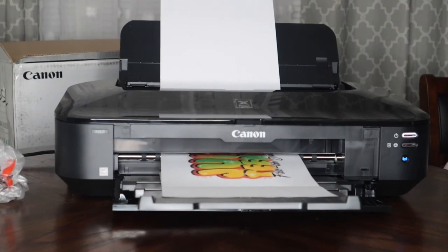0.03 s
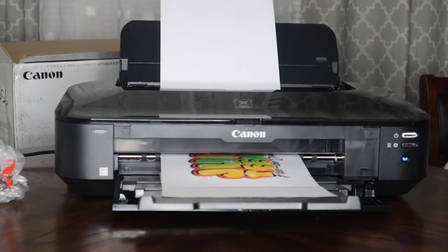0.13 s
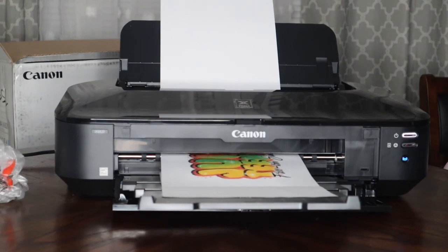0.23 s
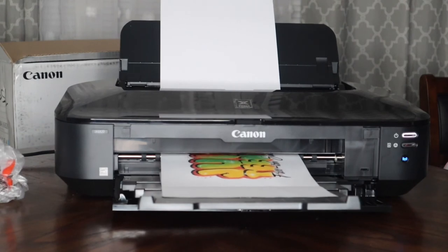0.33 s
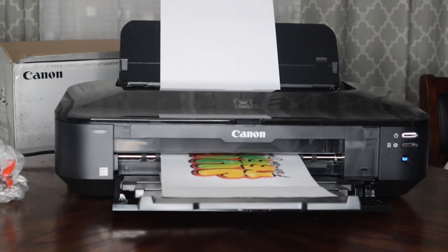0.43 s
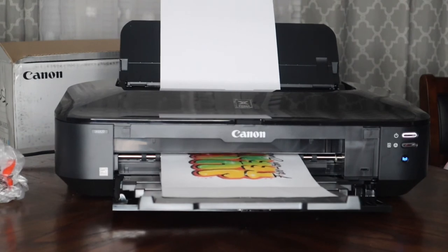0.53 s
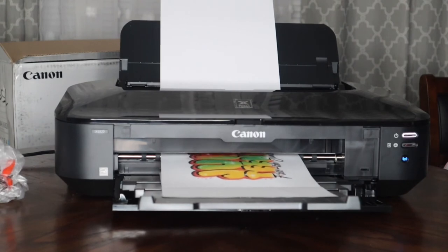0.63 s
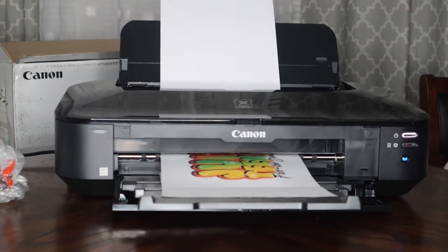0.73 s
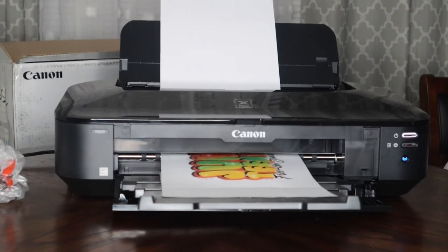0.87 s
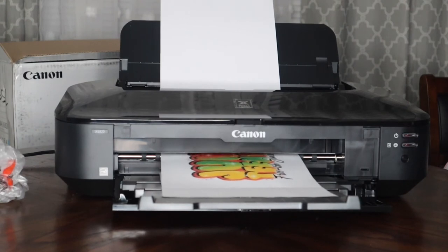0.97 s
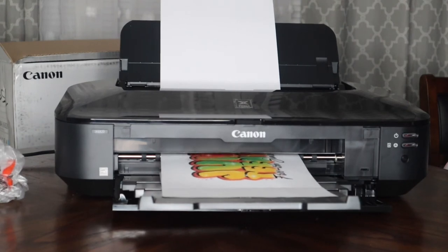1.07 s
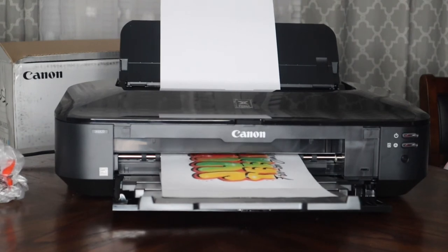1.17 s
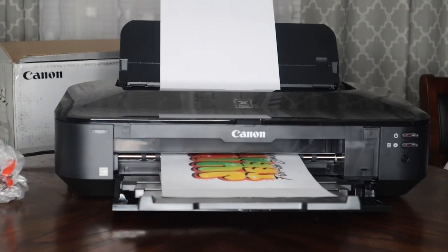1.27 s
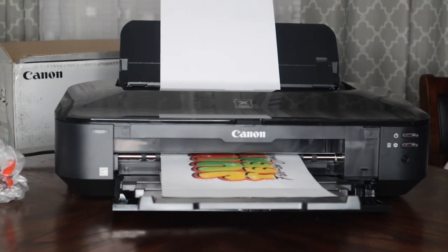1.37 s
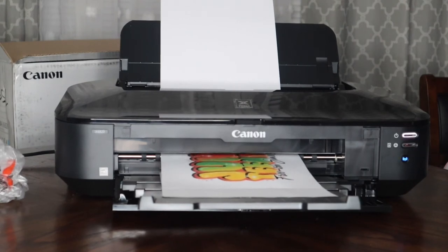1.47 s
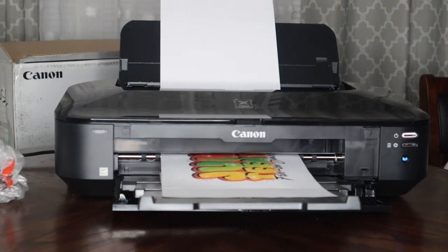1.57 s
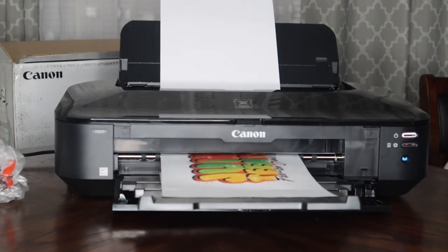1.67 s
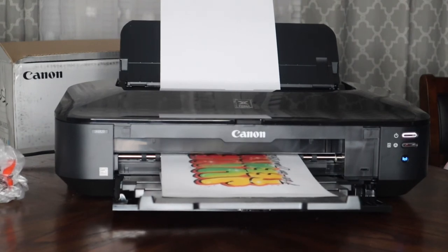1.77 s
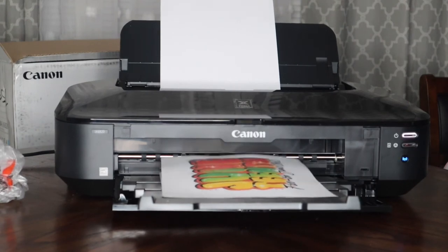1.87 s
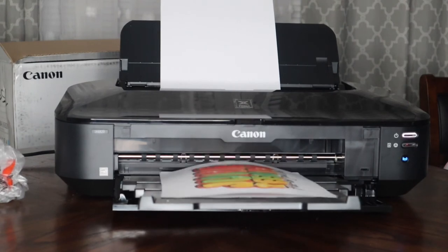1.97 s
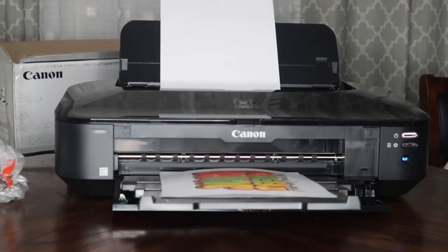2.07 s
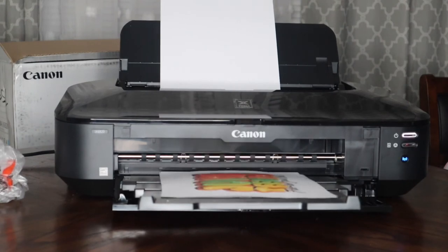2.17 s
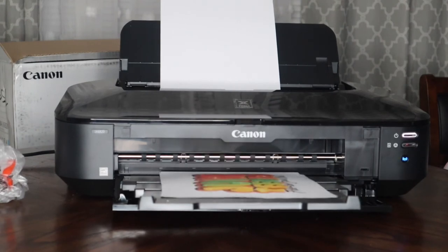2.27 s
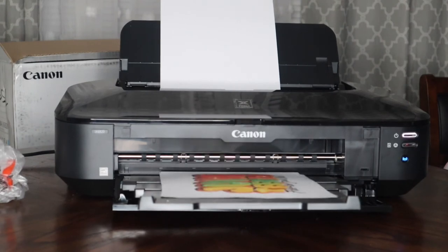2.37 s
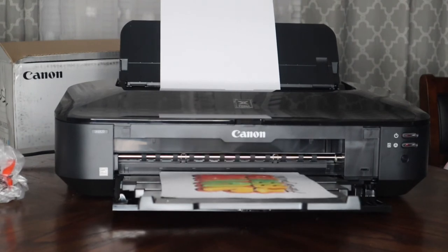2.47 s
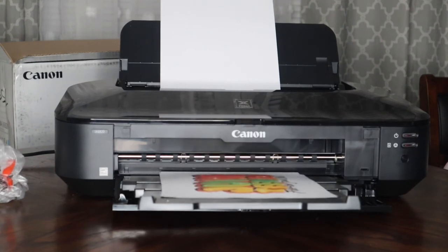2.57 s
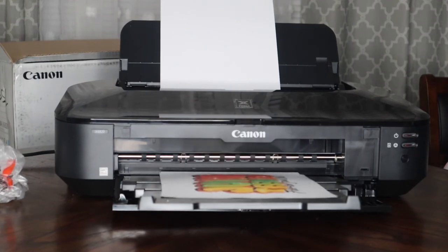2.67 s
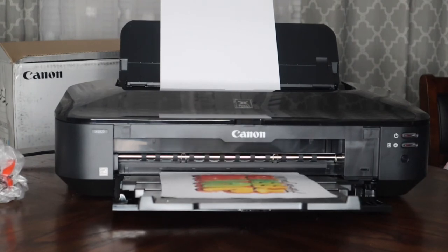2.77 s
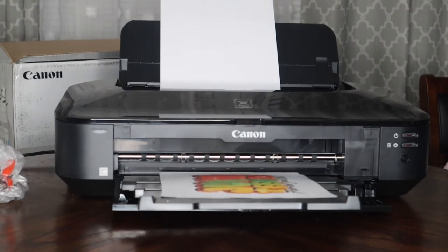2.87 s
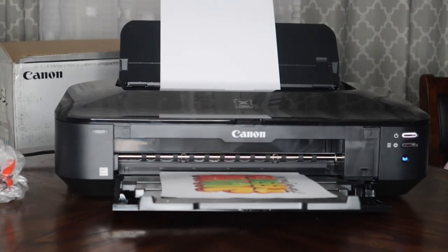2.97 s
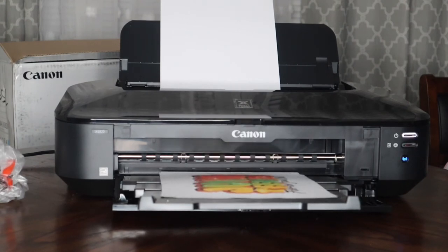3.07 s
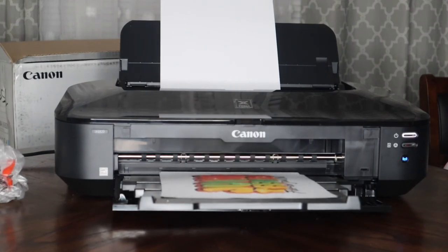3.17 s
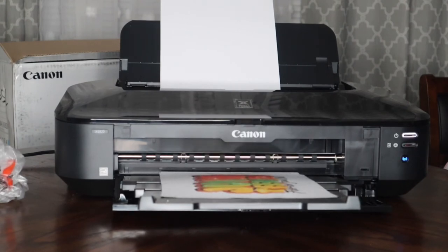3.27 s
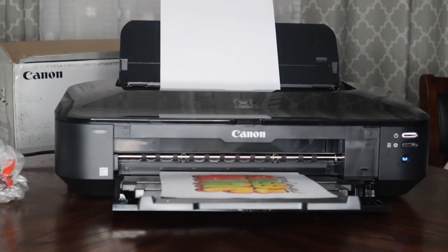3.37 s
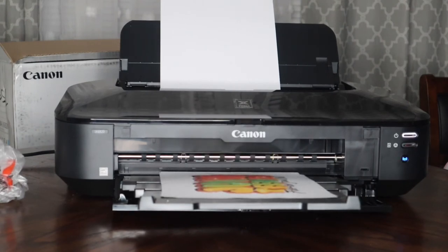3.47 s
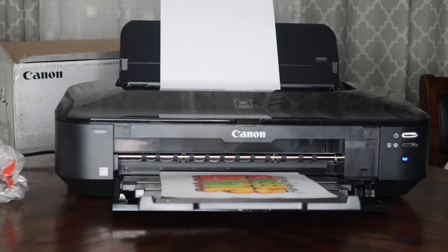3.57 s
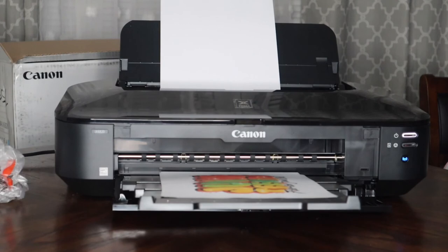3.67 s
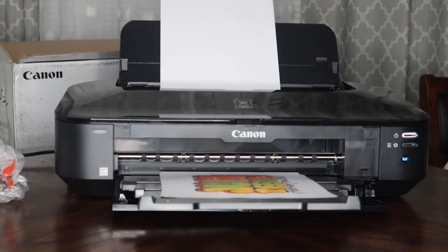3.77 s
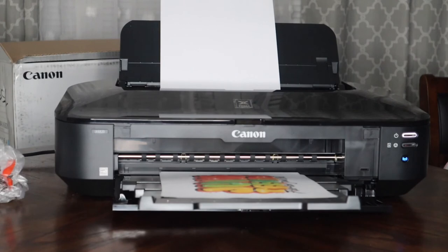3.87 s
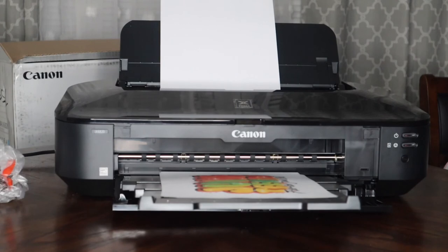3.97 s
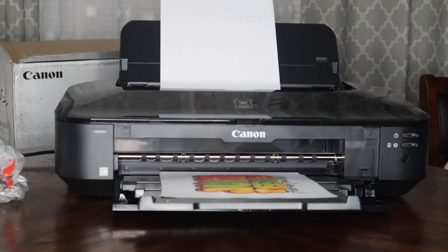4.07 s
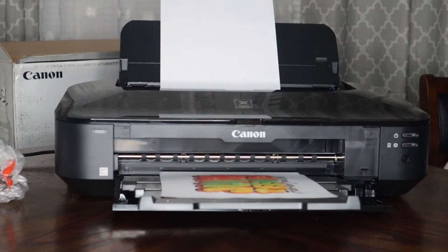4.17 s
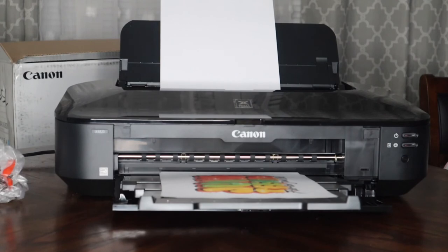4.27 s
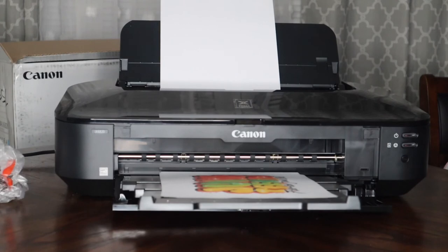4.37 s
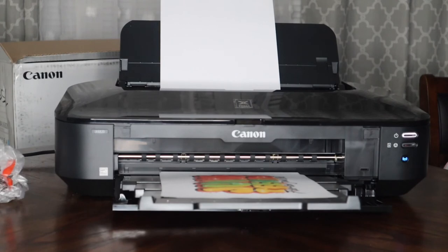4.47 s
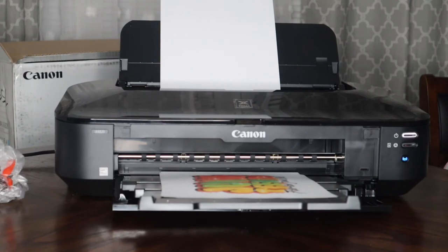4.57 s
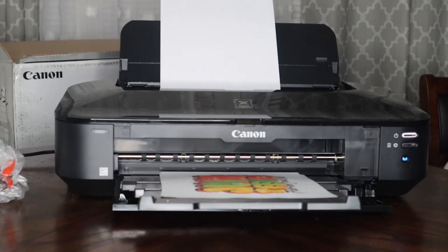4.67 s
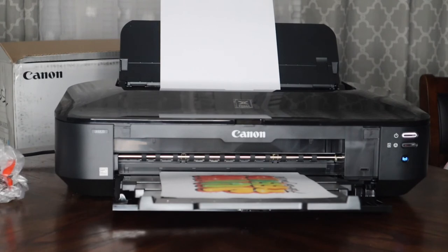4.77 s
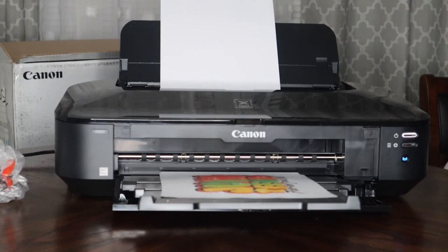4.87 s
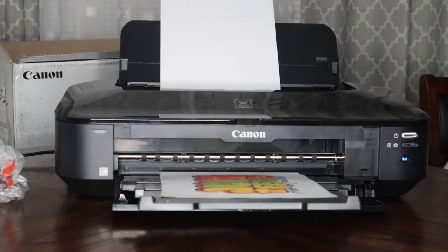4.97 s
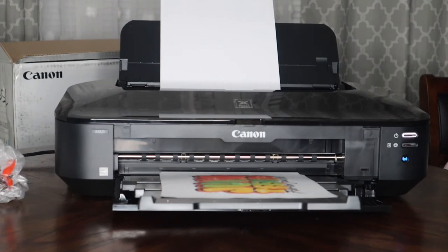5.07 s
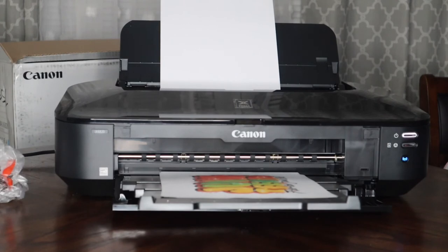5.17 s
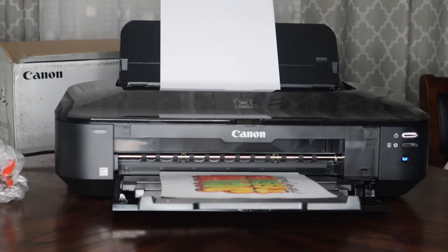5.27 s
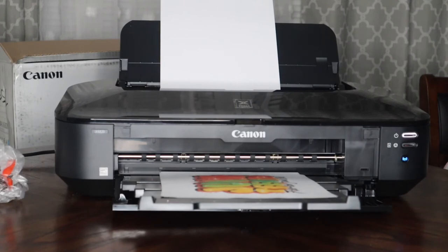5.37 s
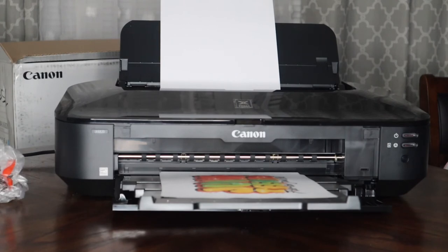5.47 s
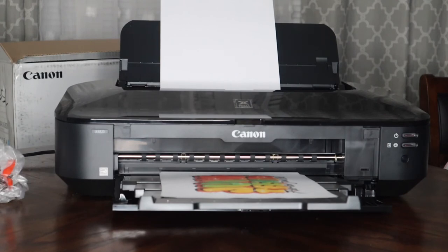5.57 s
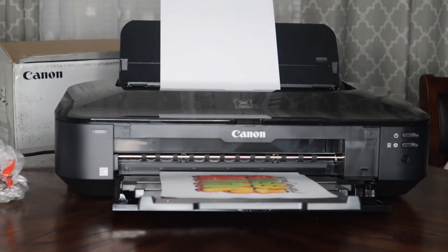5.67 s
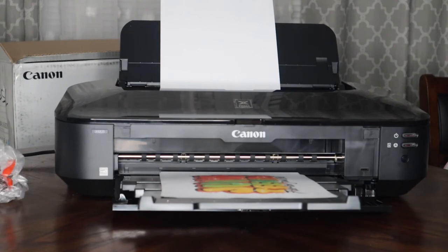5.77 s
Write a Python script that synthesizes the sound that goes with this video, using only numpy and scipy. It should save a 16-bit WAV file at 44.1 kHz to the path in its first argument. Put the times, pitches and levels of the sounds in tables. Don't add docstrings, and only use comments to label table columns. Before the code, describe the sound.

An inkjet printer's head sweeps with short whirs, gears whine the sheet out, a loud plastic clack lands, smaller clacks follow, then quiet room.

```python
import sys
import numpy as np
from scipy import signal
from scipy.fft import rfft, irfft, next_fast_len
from scipy.io import wavfile
from scipy.ndimage import uniform_filter1d

SR = 44100
rng = np.random.default_rng(int(sys.argv[2]) if len(sys.argv) > 2 else 0)


def magnitude_from_level(level_db):
    exponent = np.asarray(level_db, float) / 20
    return 10 ** exponent


def generate_wav(sig):
    pcm = np.round(np.clip(np.atleast_2d(sig).T, -1, 1) * 32767).astype(np.int16)
    wavfile.write(sys.argv[1], SR, pcm)


N = 256220


def rms_one(x):
    return x / np.sqrt(np.mean(x ** 2) + 1e-20)


def at_hz(points, hz):
    curve = np.array(points)
    return np.interp(np.log(hz), np.log(curve[:, 0]), curve[:, 1])


def colour(x, spectrum):
    size = next_fast_len(x.shape[-1])
    hz = np.maximum(np.arange(size // 2 + 1) * SR / size, 1)
    shaped = irfft(rfft(x, size) * magnitude_from_level(at_hz(spectrum, hz)), size)
    return rms_one(shaped[..., :x.shape[-1]])


def drift(rate_hz):
    r = np.exp(-80 * np.pi * rate_hz / SR)
    slow = signal.lfilter([1], [1, -2 * r, r * r], rng.standard_normal(N // 40 + 2002))[2000:]
    return np.interp(np.arange(N) / 40, np.arange(len(slow)), rms_one(slow))


def resonate(x, hz, width_hz):
    r = np.exp(-np.pi * width_hz / SR)
    poles = [1, -2 * r * np.cos(2 * np.pi * hz / SR), r * r]
    return signal.lfilter(np.array([1, 0, -1]) * (1 - r * r) / 2, poles, x + 1e-18)


def grit(spread_db, flutter_db):
    level_db = spread_db * drift(600.0) + flutter_db * drift(37.5)
    return rng.standard_normal(N) * magnitude_from_level(level_db)


def spread(count, width):
    size = next_fast_len(count)
    mid, side = rfft(rng.standard_normal((2, size)))
    hz = np.maximum(np.arange(len(mid)) * SR / size, 1)
    side = side * magnitude_from_level(at_hz(width, hz))
    return irfft(mid + side * [[1], [-1]], size)[:, :count]


def whine(lines, waver, flicker_db, speed=1):
    time = np.cumsum(speed + waver * drift(5.27)) / SR
    out = np.zeros(N)
    for hz, db in lines:
        level = magnitude_from_level(db + flicker_db * drift(3.9))
        out += level * np.sqrt(2) * np.sin(2 * np.pi * (hz * time + rng.random()))
    return out


def bursts(times, peaks_db, rises, lengths):
    out = np.zeros(N)
    for s, db, rise, length in zip(times, peaks_db, rises, lengths):
        start, length = round(s * SR), max(length, .001)
        age = np.arange(min(round(SR * min(1, 12 * length)), N - start)) / SR
        swell = 1 - np.exp(-age / max(rise, 2e-4))
        out[start:][:len(age)] += magnitude_from_level(db) * swell * np.exp(-age / length)
    return out


def moves(rows, rise, fall, sag_db=0, column=2):
    out = np.zeros(N)
    for row in rows:
        start, length = row[0], row[1]
        part = out[round(start * SR):round((start + length + 12 * fall) * SR)]
        age = np.arange(len(part)) / SR
        level = magnitude_from_level(row[column] - sag_db * np.minimum(age, length))
        part += level * np.minimum(age / rise, 1) * np.exp(-np.maximum(age - length, 0) / fall)
    return out


# hz, level_db
AIR = [(12, -52), (20, -13), (54, -0.5), (107, -5.5), (138, -1.5), (167, -7), (267, -8.5), (306, -7),
       (463, -9), (517, -12.5), (1600, -18), (14500, -44)]
# hz, side_minus_mid_db
AIR_WIDTH = [(60, -19), (150, -4.5), (380, 2), (950, 6.5), (2380, 6), (5980, 8.5), (15000, 7)]
# hz, width_hz, level_db
STANDING = [(57.4, 3.2, 1), (148, 10.3, 1), (228, 17, 0), (278.2, 5.6, 2)]
# hz, side_minus_mid_db
ROOM_WIDTH = [(60, -21), (130, -27), (290, -30), (640, -6), (1410, -3), (3100, 4), (6820, 4), (15000, 6.5)]
# start_s, dull_db, bright_db, decay_s
RUSTLES = [
    (4.55, -67, -68, .8),
    (4.757, -44, -60, .03),
    (4.995, -52, -65, 0.073),
    (5.21, -54, -57.5, 0.081),
    (5.3, -65, -72, .5),
    (5.464, -70, -58, .03),
    (5.4905, -37, -32, .006),
    (5.497, -51, -40, .075),
]
# hz, db_per_hz
DULL = [(240, -26), (400, -27), (422, -35), (513, -6.5), (800, -10), (2000, -25), (2600, -44), (4400, -120)]
# hz, db_per_hz
BRIGHT = [(820, -30), (1400, -3), (2570, 0), (3600, -11), (6540, -17), (7270, -12.5), (11900, -11.5),
          (12700, -13), (14000, -82)]
AIR_DB, RUSTLE_RISE_S = -48, .0022


def house():
    s, dull_db, bright_db, decay = np.transpose(RUSTLES)
    rise = np.full(len(s), RUSTLE_RISE_S)
    air = colour(spread(N, AIR_WIDTH), AIR)
    air = air + sum(magnitude_from_level(db) * resonate(air, hz, width) for hz, width, db in STANDING)
    dull = bursts(s, dull_db, rise, decay) * colour(spread(N, ROOM_WIDTH), DULL)
    bright = bursts(s, bright_db, rise, decay) * colour(spread(N, ROOM_WIDTH), BRIGHT)
    return magnitude_from_level(AIR_DB - 2.0 + 0.32 * drift(5.5)) * air + magnitude_from_level(-1.5) * (dull + bright)


# start_s, length_s, level_db
PASSES = [
    (0.102, .365, -49),
    (.6, .2, -50),
    (0.928, .22, -49),
    (1.251, .22, -50),
]
# start_s, length_s, level_db
STEPS = [
    (0.459, 0.13, -46.5),
    (0.798, .082, -46),
    (1.141, 0.084, -46.5),
    (1.467, 0.031, -50),
    (1.543, .07, -52),
]
# hz, db_per_hz
RUMBLE = [(210, -79), (360, -2.5), (432, 1), (834, -6.5), (1210, -10.5), (1300, -14.5), (1520, -14.5),
          (2200, -19.5), (2860, -41), (4840, -120)]
# hz, db_per_hz
SLIDE = [(760, -20), (1300, -4), (1520, -10.5), (2140, -4), (3710, -4), (4200, -2.5), (5850, -10.5),
         (11100, -12), (14000, -21), (15500, -41)]
PASS_RISE_S, PASS_FALL_S, PASS_RUMBLE_DB = .06, .035, 2
STEP_RISE_S, STEP_FALL_S, STEP_RUMBLE_DB, STEP_HISS_RISE_S = .03, .025, 6, .07


def carriage():
    passes = moves(PASSES, PASS_RISE_S, PASS_FALL_S)
    steps = moves(STEPS, STEP_RISE_S, STEP_FALL_S)
    rumble = magnitude_from_level(PASS_RUMBLE_DB) * passes + magnitude_from_level(STEP_RUMBLE_DB) * steps
    hiss = passes + magnitude_from_level(1.5) * moves(STEPS, STEP_HISS_RISE_S, STEP_FALL_S / 2)
    return magnitude_from_level(-3.5) * (rumble * colour(grit(0.4, 2.5), RUMBLE) + hiss * colour(grit(1.9, 1.5), SLIDE))


# start_s, peak_db, pitch_hz, brightness_db
TICKS = [(.11, -46, 4000, -4.5), (0.463, -29, 4600, -22), (0.48, -31, 2130, -20), (0.549, -31.5, 2080, -12),
         (0.586, -30, 4650, -23), (0.803, -34, 2320, -9), (.823, -38, 2300, -17), (0.86, -41.5, 3020, -6),
         (1.146, -38, 2150, -2.5), (1.16, -40, 2210, -16), (1.262, -37, 4320, -19),
         (1.473, -35.5, 2270, -16), (1.548, -35, 2140, -8), (1.6114, -33.5, 3600, -9),
         (1.701, -35, 2000, 6), (2.59, -36, 2390, -13.5), (2.7227, -40, 2980, -15),
         (2.752, -35, 2220, -7.5), (2.81, -39.5, 3640, -8), (2.9454, -39.5, 2700, 1),
         (3.053, -40, 3120, -21), (3.079, -38.5, 4970, -4.5), (3.091, -34, 3050, -12.5),
         (3.182, -39, 4040, -12), (3.255, -38.5, 3420, -11), (3.48, -33, 2200, -19),
         (3.602, -43.5, 5700, -2.5), (3.6156, -38, 3350, -9.5), (5.464, -51.5, 3070, 0),
         (2.227, -27, 3900, -10), (5.4905, -31, 2550, -6)]
# hz, db_per_hz
FLICK = [(880, -20), (1500, -7.5), (1950, -10.5), (6190, -10), (10500, -22.5), (13900, -26), (15500, -74)]
TICK_S = .0068


def ticks():
    notes, noise = np.zeros(N), rng.standard_normal(N)
    s, db, pitch, bright_db = np.transpose(TICKS)
    length = np.full(len(s), TICK_S)
    for at, level_db, hz, _ in TICKS:
        part = slice(round(at * SR), round(at * SR) + 4000)
        strike = bursts([at], [level_db + 9.0], [.001], [TICK_S]) * noise
        notes[part] += resonate(strike[part], hz, 160)
    click_noise = colour(noise, [(300, -33), (700, 17.5), (2500, -3.5), (5000, 0.0), (12000, -20), (15000, -26)])
    click = bursts(s, db - 2.5, .02 * length, 0.12 * length) * click_noise
    flick = bursts(s, db + bright_db - 4.5, 0.028 * length, 2.96 * length) * colour(noise, FLICK)
    return notes + click + flick


# hz, level_db
BELT = [(721.4, -60), (748.3, -60), (807.5, -60), (870, -61), (1292, -60), (2428, -71), (2902, -69),
        (4048, -73)]
BELT_LATE_S, BELT_EARLY_S, BELT_DB, BELT_SAG_DB_PER_S = .05, .018, -10, 14


def belt_whine():
    at_speed = [(s + BELT_LATE_S, length - BELT_LATE_S - BELT_EARLY_S, db + BELT_DB) for s, length, db in PASSES]
    return moves(at_speed, .02, .01, BELT_SAG_DB_PER_S) * magnitude_from_level(61) * whine(BELT, 0.004, 1.2)


# start_s, desk_thud_db, case_boom_db
SHOVES = [(.26, -59, -42), (.33, -54, -44), (.445, -52, -41), (.51, -47, -34), (.62, -46, -46),
          (.825, -37, -41), (.9, -41.5, -44), (.99, -62, -44), (1.16, -40, -42), (1.2, -47, -28),
          (1.46, -57, -40), (1.672, -41, -39), (1.73, -48, -30.5), (1.79, -48, -33), (1.9, -42.5, -32.5),
          (1.98, -48, -33), (2.135, -38, -24), (2.23, -37.5, -41), (2.38, -52, -42), (2.5, -41, -44),
          (2.85, -41, -40), (3.02, -54, -44), (3.1, -60, -48), (3.26, -59, -41), (3.36, -40, -46),
          (3.62, -54, -50), (3.944, -41, -45), (3.98, -52, -30), (4.1, -62, -45), (4.26, -69, -51)]
THUD_HZ, BOOM_HZ = 193, 314.6
SHOVE_RISE_S, THUD_DECAY_S, BOOM_DECAY_S = .015, .036, .026
TREMBLE_THUD_DB, TREMBLE_BOOM_DB = -8.5, -2


def shaken_body():
    s, thud_db, boom_db = np.transpose(SHOVES)
    running, each = moves(PASSES + STEPS + CAMS, PASS_RISE_S, CAM_FALL_S), np.ones(len(s))
    thud = magnitude_from_level(TREMBLE_THUD_DB) * running
    thud = thud + bursts(s, thud_db + 3.0, SHOVE_RISE_S * each, THUD_DECAY_S * each)
    boom = magnitude_from_level(TREMBLE_BOOM_DB) * running
    boom = boom + bursts(s, boom_db + 4.5, SHOVE_RISE_S * each, BOOM_DECAY_S * each)
    desk = resonate(resonate(grit(0, 0.57), THUD_HZ, 60), THUD_HZ, 68)
    case = resonate(resonate(grit(0, 1.9), BOOM_HZ, 30), BOOM_HZ, 53)
    return thud * magnitude_from_level(2.0) * rms_one(desk) + boom * magnitude_from_level(-2.0) * rms_one(case)


# start_s, length_s, hum_db
HUMS = [
    (.44, 0.096, -43),
    (2.2, .22, -39.5),
    (2.49, 0.13, -47),
    (3.2, .04, -52),
    (2.84, .19, -38.5),
    (3.33, .19, -48.5),
    (3.69, .08, -51),
]
HUM_HZ, HUM_RISE_S, HUM_FALL_S = 152.54, .09, .037


def cam_hum():
    return moves(HUMS, HUM_RISE_S, HUM_FALL_S) * whine([(HUM_HZ, -2.5)], 0.005, .5)


# start_s, peak_db, pitch_hz, t60_s
KNOCKS = [(1.701, -25, 520, .06), (2.134, -11, 980, .05), (2.138, -13, 3100, .025),
          (2.139, -15, 3900, .025), (2.148, -12, 1280, .05), (2.158, -13, 330, .05),
          (2.159, -12, 1090, .04), (2.183, -17, 1950, .05), (2.194, -20, 1280, .05),
          (2.5005, -27, 2750, .03), (2.504, -27, 700, .03), (2.511, -24, 600, .03), (2.524, -28, 870, .03),
          (2.539, -27, 330, .04), (2.846, -25, 2750, .035), (2.855, -23, 700, .035), (2.865, -26, 500, .04),
          (2.885, -28, 600, .04), (3.3605, -29, 2650, .035), (3.364, -27, 850, .04), (3.371, -28, 600, .03),
          (3.383, -26, 850, .03), (3.396, -29, 300, .05), (3.943, -40, 700, .04), (3.981, -28, 450, .05),
          (4.005, -27, 760, .07), (4.024, -30, 640, .05), (.468, -34, 540, .06), (.49, -32, 440, .06),
          (1.557, -36, 480, .06), (1.568, -36, 560, .05)]
KNOCK_RISE_S, KNOCK_PARTNER_RATIO, KNOCK_PARTNER_DB = .0012, 1.56, -5


def knocks():
    out, age = np.zeros(N + SR), np.arange(SR // 5) / SR
    for s, db, hz, t60 in KNOCKS:
        partner = np.sin(2 * np.pi * KNOCK_PARTNER_RATIO * hz * age)
        pair = np.sin(2 * np.pi * hz * age) + magnitude_from_level(KNOCK_PARTNER_DB) * partner
        out[round(s * SR):][:len(age)] += magnitude_from_level(db - 60 * age / t60) * (1 - np.exp(-age / KNOCK_RISE_S)) * pair
    return out[:N]


# start_s, length_s, whirr_db, hiss_db
CAMS = [(1.655, .035, -47, -54), (2.106, .03, -41.5, -58), (2.135, .06, -38, -35), (2.297, 0.15, -52, -72),
        (2.502, .2, -51.5, -61), (2.737, 0.081, -47.5, -58), (2.86, 0.13, -47.5, -72),
        (3.07, .05, -46, -57), (3.184, .1, -56.5, -55.5), (3.359, 0.036, -40.5, -52.5),
        (3.46, 0.073, -52.5, -60), (3.587, 0.046, -45, -60), (3.68, .26, -59, -60.5)]
CAM_RISE_S, CAM_FALL_S = .015, .044


def cam_motor():
    whirr = moves(CAMS, CAM_RISE_S, CAM_FALL_S)
    hiss = moves(CAMS, CAM_RISE_S, CAM_FALL_S, column=3)
    whirr = whirr * magnitude_from_level(-2) * colour(grit(3.6, 3.2), RUMBLE)
    return whirr + hiss * magnitude_from_level(-7.0) * colour(grit(1.5, 1.6), SLIDE)


# start_s, length_s, rumble_db, hiss_db
EJECT = (1.69, .347, -29.5, -32.5)
# start_s, length_s, rumble_db, hiss_db
PARK = (3.95, 0.078, -29.5, -39.5)
# hz, db_per_hz
GRIND = [(120, -39), (200, -18), (305, -10), (460, -1), (559, -5), (738, -3), (896, -2.5), (1320, -9.5),
         (2360, -13.5), (3600, -35), (4680, -40), (7920, -120)]
# hz, db_per_hz
PAPER = [(1470, -20), (2500, 2.5), (3170, -3), (3890, -5), (11500, -8.5), (13600, -17), (14500, -40),
         (15500, -70)]
EJECT_RISE_S, EJECT_FALL_S, EJECT_SAG_DB_PER_S = .012, .02, 8
SHEET_RISE_S, SHEET_LEAVES_S, SHEET_SAG_DB_PER_S = .065, .028, 18
PARK_RISE_S, PARK_FALL_S, PARK_HISS_EARLY_S, HISS_FALL_S = .05, .016, .01, .006


def rollers():
    start, length, _, hiss_db = EJECT
    sheet_run = (start, length - SHEET_LEAVES_S, hiss_db)
    park_run = (PARK[0] - PARK_HISS_EARLY_S, PARK[1] + .005, PARK[3])
    hiss = moves([sheet_run], SHEET_RISE_S, HISS_FALL_S, SHEET_SAG_DB_PER_S)
    hiss = hiss + moves([park_run], PARK_RISE_S, HISS_FALL_S)
    grind = colour(grit(3.0, 1.0), GRIND)
    sheet = colour(grit(0.49, 1.85), PAPER)
    shudder = rms_one(grind + 3.5 * resonate(grind, 730, 130) + 2.6 * resonate(grind, 423, 73))
    eject = moves([EJECT], EJECT_RISE_S, EJECT_FALL_S, EJECT_SAG_DB_PER_S) * grind
    park = moves([PARK], PARK_RISE_S, PARK_FALL_S) * shudder
    return magnitude_from_level(-1.5) * (eject + park) + magnitude_from_level(-2.5) * hiss * sheet


# hz, level_db
GEARS = [(409.1, -48), (559.9, -41), (899.0, -37), (1082, -44), (1125, -46), (1685, -50), (2110, -52),
         (2320, -49), (2390, -49), (2832, -51), (3822, -56)]
GEAR_SLIP, GEAR_CATCH_UP_S, GEAR_SPIN_UP_S = .3, .022, .03


def gear_teeth():
    age = np.maximum(np.arange(N) / SR - EJECT[0], 0)
    speed = 1 - GEAR_SLIP * np.exp(-age / GEAR_CATCH_UP_S)
    level = moves([EJECT], GEAR_SPIN_UP_S, EJECT_FALL_S, EJECT_SAG_DB_PER_S)
    return level * magnitude_from_level(33.5) * whine(GEARS, .003, 1.2, speed)


# start_s, peak_db, brightness_db, rise_s, length_s
CLACKS = [(2.13, -11, -30, 0.005, 0.017), (2.136, -2, 0, 0.0019, 0.0046), (2.143, -4, -5, 0.0031, 0.0092),
          (2.158, -7, -20, 0.00085, 0.0072), (2.166, -15, -15, 0.002, 0.0052),
          (2.499, -21, 0, 0.0016, 0.0092), (2.556, -31, -14, 0.002, 0.0087),
          (2.844, -21, 7, 0.0043, 0.0086), (2.854, -24, -32, 0.0025, 0.015),
          (2.893, -33, -35, 0.002, 0.0058), (3.359, -26, 4, 0.0016, 0.012),
          (3.371, -28, -29, 0.002, 0.0078), (3.387, -49, -29, 0.0023, 0.0057)]
# hz, db_per_hz
BLOW = [(71, -50.5), (120, -12.5), (330, -11), (494, -8), (546, -13.5), (818, 1), (1150, -0.5),
        (1990, -13.5), (3870, -20.5), (7550, -37), (10400, -28), (15000, -66)]
# hz, width_hz, level_db
CASE = [(412, 15, 6.5), (555, 18, 5), (1288, 30, -3), (1824, 22, -10), (2000, 230, 6), (2490, 89, -9),
        (2660, 23, -25), (3120, 42, 4), (3870, 110, 1), (4120, 120, 2), (4100, 22, -21), (4800, 100, -51)]


def clacks():
    s, db, _, rise, length = np.transpose(CLACKS)
    blow = bursts(s, db - 11, rise, length)
    shiver = bursts(s, db - 24.5, 4.3 * rise, 3.3 * length)
    rattle = (blow + shiver) * colour(grit(1.0, 0), BLOW)
    panels = sum(magnitude_from_level(level_db - 0.5) * resonate(rattle, hz, max(width, 50.0)) for hz, width, level_db in CASE)
    return 0.79 * rattle + panels


def cracks():
    s, db, bright_db, rise, length = np.transpose(CLACKS)
    contact = bursts(s, db + bright_db - 15.5, 0.26 * rise, 0.62 * length)
    shiver = bursts(s, db + bright_db - 28, 2.0 * rise, 3.4 * length)
    snap_noise = colour(rng.standard_normal(N), [(1200, -16.5), (2700, 1.5), (3500, -2.5), (4300, -4.5),
                                                 (5200, -12.5), (9000, -22), (13000, -27), (15000, -48)])
    snap = (contact + shiver) * snap_noise
    return snap + 0.5 * resonate(snap, 2760, 203) + 0.85 * resonate(snap, 4130, 190)


# time_s, tooth_rate_hz, level_db
RUN_UP = [
    (3.94, 180, -55),
    (3.95, 195, -35),
    (3.975, 230, -37),
    (4.0, 325, -34),
    (4.03, 370, -37),
    (4.07, 370, -45),
    (4.12, 365, -70),
]


def run_up():
    s, hz, db = np.transpose(RUN_UP)
    time = np.arange(N) / SR
    turn = 2 * np.pi * np.cumsum(np.interp(time, s, hz)) / SR
    level_db = np.interp(time, s, db, left=-150, right=-150) + 1.5 * drift(40.0)
    return magnitude_from_level(level_db) * (np.sin(turn) + .7 * np.sin(2 * turn))


# hz, t60_s
ROOM_T60 = [(100, 0.55), (500, 0.53), (2000, 0.52), (6000, 0.4), (14000, 0.12)]
LEFT_LEAD_S, ROOM_DB = .00007, -4.5


def room_tail():
    size = 3 * SR // 4
    age, white, tail = np.arange(size) / SR, spread(size, ROOM_WIDTH), 0
    edges = 45 * 2 ** np.arange(0, 8.6, .5)
    for low, high in zip(edges, edges[1:]):
        t60 = max(at_hz(ROOM_T60, np.sqrt(low * high)), .05)
        band = signal.sosfilt(signal.butter(2, [low, high], "band", fs=SR, output="sos"), white)
        tail = tail + band * magnitude_from_level(-60 * age / t60)
    left, right = tail * (1 - np.exp(-(age / .007) ** 2))
    lines = rfft(np.array([left + right, left - right]))
    power = np.abs(lines) ** 2 + 1e-12
    fine, broad = uniform_filter1d(power, size=16), uniform_filter1d(power, size=600)
    mid, side = irfft(lines * np.sqrt(broad / fine), size)
    tail = mid + side * [[1], [-1]]
    return tail / np.sqrt(np.sum(tail.mean(axis=0) ** 2))


def room(x, tones):
    near = x + tones
    bass = signal.butter(1, 1800, fs=SR, output="sos")
    lead = LEFT_LEAD_S * SR / 2 * signal.sosfiltfilt(bass, np.gradient(near))
    scattered = 0.62 * signal.sosfilt(signal.butter(2, 1100, "high", fs=SR, output="sos"), near)
    for lag in (11, 23, 47, 79):
        echo = np.r_[.6, np.zeros(lag - 1), 1]
        scattered = signal.lfilter(echo, echo[::-1], scattered)
    wet = signal.fftconvolve(x[None] + 0.64 * tones, room_tail(), axes=1)[:, :N]
    return near + (lead + scattered) * [[1], [-1]] + magnitude_from_level(ROOM_DB) * wet


CLACK_DRY = .6


def scene():
    air = house()
    body = carriage() + shaken_body() + cam_motor() + rollers()
    tones = ticks() + belt_whine() + cam_hum() + knocks() + gear_teeth() + cracks() + run_up()
    blows = clacks()
    return air + room(body + (1 - CLACK_DRY) * blows, tones + CLACK_DRY * blows)


def low_pass(x):
    return signal.sosfilt(signal.butter(12, 15600, fs=SR, output="sos"), x)


def record(dry):
    rounded = .85 * np.tanh(dry / .85)
    heard = signal.sosfilt(signal.butter(8, 14700, fs=SR, output="sos"), rounded)
    return low_pass(heard)


dry = scene()
out = record(dry)
generate_wav(out)
```